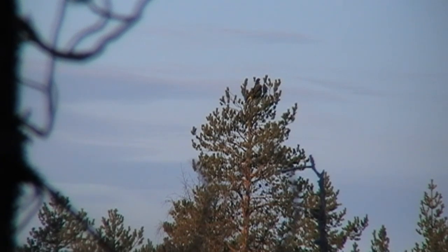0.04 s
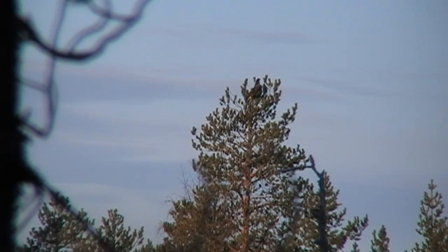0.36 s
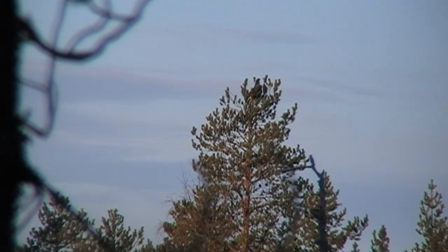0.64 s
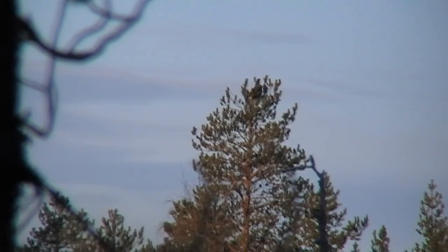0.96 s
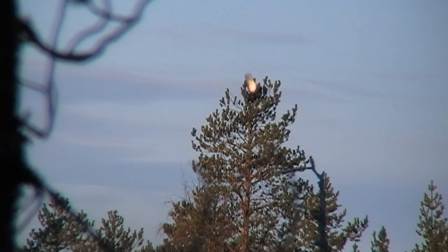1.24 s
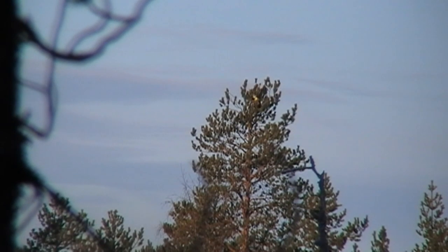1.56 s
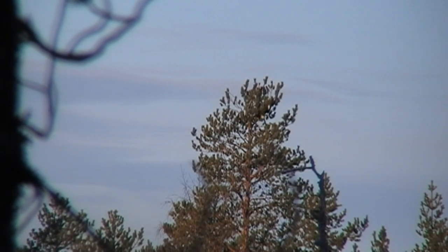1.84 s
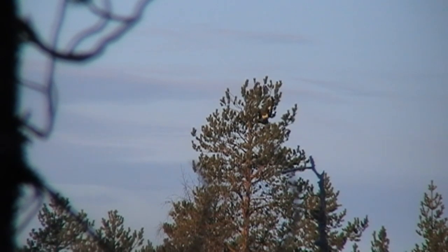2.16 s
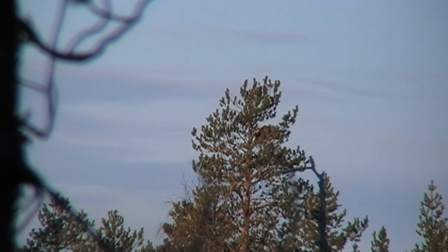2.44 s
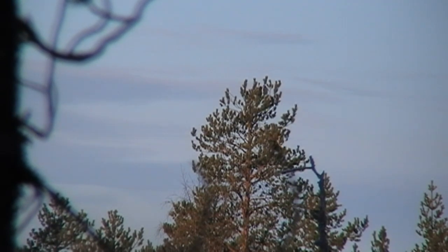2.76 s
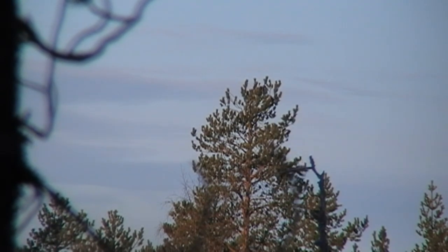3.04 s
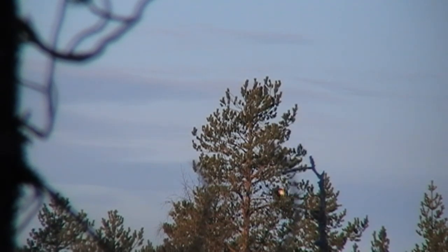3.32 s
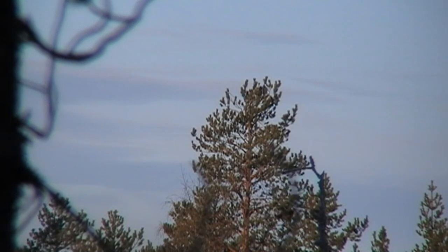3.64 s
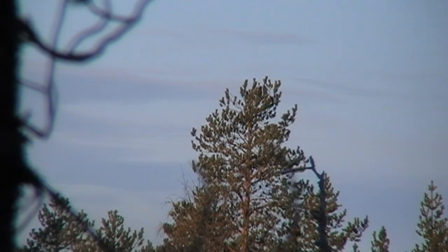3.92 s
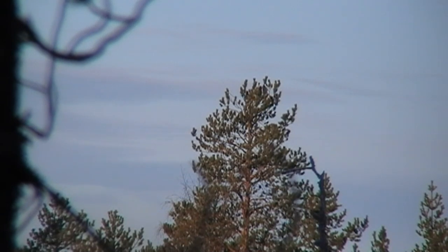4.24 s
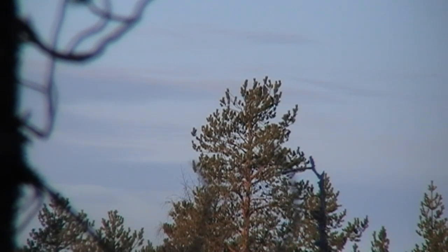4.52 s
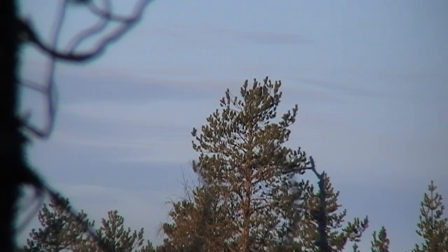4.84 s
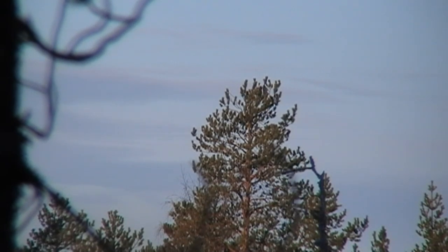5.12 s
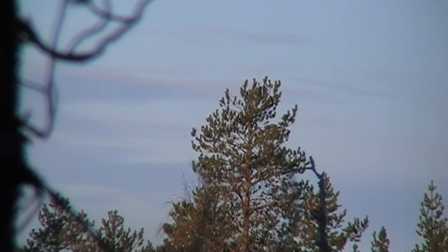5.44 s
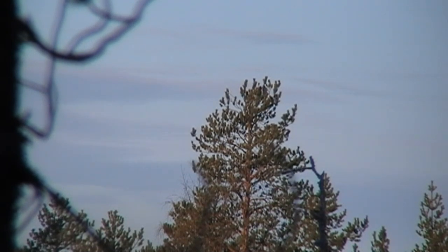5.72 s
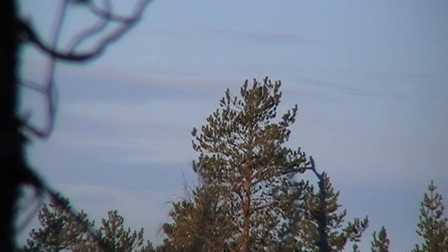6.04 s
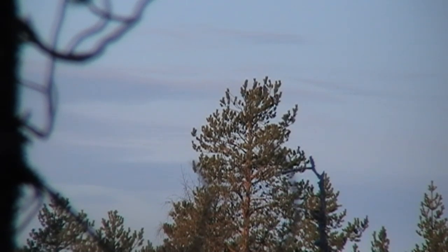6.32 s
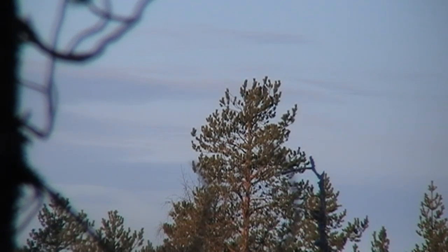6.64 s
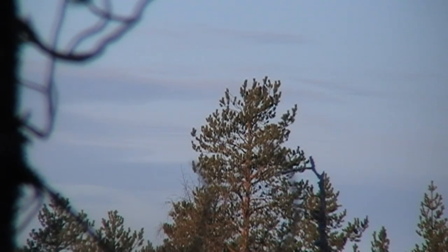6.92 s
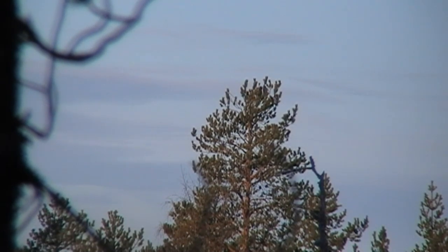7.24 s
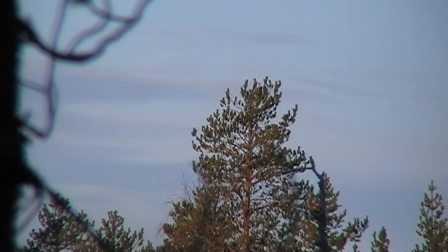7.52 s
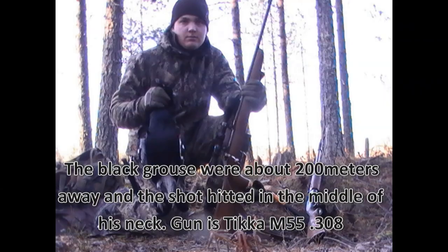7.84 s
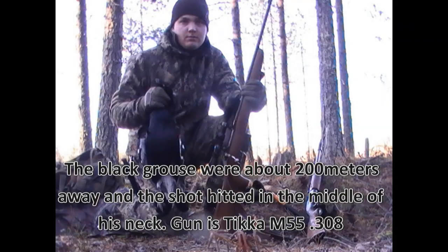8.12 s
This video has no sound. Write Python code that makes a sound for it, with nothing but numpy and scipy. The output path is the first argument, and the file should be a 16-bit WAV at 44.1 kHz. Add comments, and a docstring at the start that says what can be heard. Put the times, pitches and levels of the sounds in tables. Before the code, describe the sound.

It starts very quietly in a pine forest, with faint wind, a steady hiss and the thin whine and rustle of a camera's own motors. At about 0.9 seconds a single rifle shot goes off right beside the microphone, a sudden, very loud blast that briefly overloads it. Until about 1.5 seconds a bright crack scatters back from the trees, with a few hard snaps off individual trunks. The blast rolls on as a broad echo, swelling around 1.6 and 2.4 seconds, then fading steadily and growing duller with distance over the next several seconds. From about 3.5 seconds the small lens motor gradually comes through the dying echo, with short, faint whirs, hums and tiny ticks over the soft wind and hiss. These continue until the sound cuts off at about 7.8 seconds.

```python
"""One rifle shot in a pine forest, fired beside a camera.
At first there is only faint wind and hiss, and the whine and rustle of the camera's own motors.
About a second in, the muzzle blast hits and overloads the camera's microphones.
The bullet's bright crack then scatters back from the tree trunks, and the blast rolls on for
seconds, duller with distance. As it fades, the little motors come through again."""
import sys
import numpy as np
from scipy import signal
from scipy.fft import rfft, irfft, next_fast_len
from scipy.io import wavfile
from scipy.ndimage import uniform_filter1d, minimum_filter1d, map_coordinates

SR = 44100
rng = np.random.default_rng(int(sys.argv[2]) if len(sys.argv) > 2 else 0)


def wrap_up_sound(samples):
    """Save the sound to the file named by the first command line argument, as 16-bit audio."""
    columns = np.atleast_2d(samples).T
    # keep every value between -1 and 1, then stretch to whole-number steps
    tamed = np.clip(columns, -1, 1)
    steps = np.round(tamed * 32767).astype(np.int16)
    wavfile.write(sys.argv[1], SR, steps)


N = 364707
T = np.arange(N) / SR
SHOT_S, END_S = 0.9444, 7.772

# Tone colours of the wind and the hiss: (frequency [Hz], relative level [dB])
WIND_COLOUR = [(30, -23.5), (100, -19), (200, -5.5), (300, 3), (500, -2), (850, -3.5), (1200, -10),
               (2500, -25), (8000, -47)]
HISS_COLOUR = [(300, -11), (1200, 1), (2400, 1), (3300, -3.5), (4500, -7.5), (5800, -5.5), (8000, -11.5),
               (11000, -13.5), (15500, -23)]
# Stereo width of the background: (frequency [Hz], side compared with middle [dB])
BACKGROUND_WIDTH = [(60, 4.5), (700, 3), (1400, 5.5), (2400, 0), (4400, 5.5), (15000, -1)]
# Tone colour of the camera's faint buzz: (frequency [Hz], relative level [dB])
BUZZ_COLOUR = [(1500, -35.5), (3200, 1.5), (4100, -2.5), (5000, -11), (7500, -14.5), (14000, -45.5)]
# Runs of the lens drive: (start [s], end [s], rustle level [dB], load on the motor [0-1])
LENS_RUNS = [(0.064, 0.108, -66, .7), (.32, 0.497, -67.5, 0.76), (3.36, 3.441, -61.5, .8),
             (3.84, 3.885, -62.5, .8), (4.24, 4.383, -68, 0.77), (4.68, 4.96, -68, 0.95),
             (5.01, 5.219, -63.5, 0.6), (5.27, 5.4, -65, 1), (5.802, 5.971, -71.5, 0.52),
             (6.07, 6.28, -66.5, .85), (6.47, 6.55, -69.5, 0.38), (6.73, 6.92, -69, .45),
             (7.118, 7.283, -68.5, 0.43), (7.691, 7.78, -69, .25)]
# Short, lower hums of the lens drive: (time [s], half length [s], level [dB])
LENS_HUMS = [(0.085, 0.016, -69), (0.343, .03, -68), (0.44, 0.031, -74), (4.842, 0.023, -61),
             (6.166, .04, -74), (6.824, .025, -62.5), (7.221, 0.052, -65.5), (7.737, 0.042, -67)]
# Single steps of the lens drive: (time [s], relative peak level [dB], fade time [s])
LENS_TICKS = [(0.1037, -65, .008), (0.3556, -70, 0.0085), (0.483, -64.5, 0.022), (1.892, -48, 0.032),
              (2.415, -56, 0.03), (4.3297, -62, 0.006), (4.4434, -56.5, 0.0046), (4.5587, -58, .007),
              (4.8424, -60, 0.0053), (4.9194, -59, .007), (5.022, -58, 0.01), (5.3766, -60, .008),
              (5.878, -62, .004), (6.254, -57, 0.0092), (6.4494, -59, 0.004), (6.485, -52, 0.0055)]
# Pitches at which the camera's case rings: (frequency [Hz], width [Hz], relative level [dB])
CASE_RINGS = [(1430, 240, 4), (2920, 270, 2.5), (3264, 190, 5), (3850, 400, 0), (4770, 600, -7),
              (5700, 400, -7.5), (7400, 270, -9)]

# Tone colours of the two echoes before the air dulls them: (frequency [Hz], relative level [dB])
CRACK_ECHO_COLOUR = [(300, -73), (600, -34.5), (1000, -12), (1250, -10), (1550, -2.5), (1800, -1.5),
                     (2080, 0.5), (2450, -7.5), (3100, -8), (4200, -17), (5600, -24.5), (6500, -31.5),
                     (8200, -36), (10500, -47.5), (15000, -55.5)]
ROLL_ECHO_COLOUR = [(50, -56), (110, -52), (180, -34.5), (260, -17), (380, -7), (520, -2), (680, 0.5),
                    (880, 0.5), (1100, -7.5), (1400, -14.5), (2000, -23), (3500, -45), (8000, -93)]
# Soft ground and trunks swallow the lows of early echoes: (frequency [Hz], relative level [dB])
GROUND_COLOUR = [(60, -7), (150, -16), (280, -16), (450, -9), (650, -2), (900, 4)]
# Brightness of the scattered crack: (time [s], slope from 2 to 3.5 kHz [dB per octave])
CRACK_BRIGHTNESS = [(1.02, 5.5), (1.15, 3), (1.245, 1), (1.29, -2), (1.37, -5), (1.6, -8), (2.0, -2),
                    (2.6, -5.5)]
# Stereo width of the echoes: (frequency [Hz], side compared with middle [dB])
ECHO_WIDTH = [(60, 1.5), (150, -7), (350, -17), (700, -18), (1300, -10), (2300, -17), (3200, -4.5),
              (4400, 3.5), (8000, 2), (15000, -5.5)]
# Which way the echoes lean: (frequency [Hz], left minus right [dB])
ECHO_BALANCE = [(200, 0.5), (600, -1), (900, 0), (1300, 1.5), (2400, 2), (4400, 2), (9000, -1)]
# Hillsides and thick trees swell the echoes, clearings thin them:
# (time [s], half length [s], change in the crack [dB], change in the roll [dB])
LANDSCAPE = [(1.072, 0.026, -3.5, -4), (1.21, 0.085, 0.5, 1.3), (1.284, 0.021, 3, 0),
             (1.385, 0.034, -1, -3), (1.619, 0.066, .6, 5.5), (2.021, .09, -0.4, -2),
             (2.358, 0.16, 1.55, 2), (5.55, 0.17, -1.5, -0.7), (6.75, 0.71, 2, 3)]
# Single hard echoes from trunks along the bullet's path: (time [s], peak level [dB], pitch [Hz])
TRUNK_ECHOES = [(1.0003, -8.5, 2240), (1.006, -7.5, 870), (1.029, -17, 2030), (1.1221, -7.5, 2160),
                (1.2689, -8.5, 2000), (1.2768, -14, 2050), (1.2893, -5.5, 1850), (1.2913, -6.5, 2040),
                (1.3421, -1, 1980)]

# Tone colours of the blast and its boom off the ground: (frequency [Hz], relative level [dB])
MUZZLE_COLOUR = [(30, -28), (100, -23), (200, -17.5), (330, -10.5), (470, -8), (780, -1.5), (1200, -11),
                 (1950, 2.5), (2450, -8.5), (3100, -7), (4200, -13), (6400, -19.5), (10000, -32),
                 (15500, -45.5)]
GROUND_BOOM_COLOUR = [(30, -9), (70, -5.5), (150, -1), (300, 6.5), (450, 3.5), (700, -17.5), (1500, -61.5)]
# Stereo width of the blast: (frequency [Hz], side compared with middle [dB])
MUZZLE_WIDTH = [(60, -2.5), (200, -1), (700, -2), (2000, -7.5), (4400, 1), (12000, 2.5)]


def amp(db):
    """Turn decibels into a number to multiply by."""
    return 10 ** (np.asarray(db) / 20)


def along(points, hz):
    """Read a (frequency, value) table at hz, with frequencies spaced by octaves."""
    frequencies, values = np.transpose(points)
    return np.interp(np.log(hz + 1), np.log(frequencies + 1), values)


def noise():
    """Two unrelated white noises."""
    return rng.standard_normal((2, N))


def wobble(rate):
    """A smooth curve through `rate` random points a second."""
    return map_coordinates(rng.standard_normal(int(N * rate / SR) + 4), [T * rate])


def filtered(x, response):
    """Make each frequency of x louder or softer by response(hz)."""
    size = next_fast_len(N + SR // 2)
    return irfft(rfft(x, size) * response(np.fft.rfftfreq(size, 1 / SR)), size)[..., :N]


def coloured(pair, colour, width):
    """Turn two unrelated signals into left and right, with a tone colour and a stereo width."""
    mid, side = filtered(pair, lambda hz: amp([along(colour, hz), along(colour, hz) + along(width, hz)]))
    return np.array([mid + side, mid - side]) / np.std(mid)


def fuzzy_tone(pitch_hz, width_hz):
    """A narrow band of noise around a wavering pitch, at an average (rms) level of 1."""
    phase = 2 * np.pi * np.cumsum(pitch_hz + 30 * wobble(30)) / SR
    a, b = filtered(noise(), lambda hz: 1 / (1 + (hz / width_hz) ** 4))
    tone = a * np.cos(phase) + b * np.sin(phase)
    return tone / np.sqrt(np.mean(tone ** 2) + 1e-20)


def envelope(start_s, attack_s, hold_s, fall_db_per_s):
    """Rises to 1, holds until hold_s after the start, then dies away."""
    age = T - start_s
    return np.clip(age / attack_s, 0, 1) * amp(-fall_db_per_s * np.maximum(age - hold_s, 0))


def swell(time_s, half_s):
    """A bell-shaped rise and fall around a moment."""
    return np.exp(-((T - time_s) / half_s) ** 2 / 2)


def running(start_s, end_s, ramp_s):
    """0 at rest, sliding towards 1 while the lens drive runs."""
    return np.clip(.5 + np.minimum(T - start_s, end_s - T) / ramp_s, 0, 1)


def wind_and_hiss(wind_db=-72, hiss_db=-72):
    """Faint wind in the pines over a steady hiss."""
    wind = amp(wind_db + .9 * wobble(4.2)) * coloured(noise(), WIND_COLOUR, BACKGROUND_WIDTH)
    return wind + amp(hiss_db) * coloured(noise(), HISS_COLOUR, BACKGROUND_WIDTH)


def motor(whine_db=-65.5, whine_hz=1954, sag_db=6.5, sag_hz=150, buzz_db=-78, ticks_per_s=50):
    """A whine that sags under load, short lower hums, and a faint camera buzz of 50 ticks a second."""
    load = sum(share * running(start, end, ramp_s=.09) for start, end, _, share in LENS_RUNS)
    load = np.clip(load, 0, 1)
    whine_level = amp(whine_db - sag_db * load + wobble(9))
    whine = whine_level * fuzzy_tone(whine_hz - sag_hz * load, width_hz=165)
    since_tick = T % (1 / ticks_per_s)
    ticks = noise() * np.exp(-since_tick / .005)
    buzz = amp(buzz_db) * coloured(ticks, BUZZ_COLOUR, BACKGROUND_WIDTH)
    hum_level = sum(amp(db) * swell(time, half) for time, half, db in LENS_HUMS)
    return whine + hum_level * fuzzy_tone(pitch_hz=1440, width_hz=48) + buzz


def camera_case(hz, soft_hz=8500):
    """How much of each frequency the case passes: it rings at a few pitches and softens the top."""
    rings = sum((-1) ** k * amp(db) * 1j * hz * width / (pitch ** 2 - hz ** 2 + 1j * hz * width)
                for k, (pitch, width, db) in enumerate(CASE_RINGS))
    return rings / (1 + (hz / soft_hz) ** 6)


def lens_drive(idle_db=-77, tick_gain_db=-.5, width=.7):
    """The lens drive rustles and ticks, heard through the ringing case."""
    runs = sum(amp(db) * running(start, end, ramp_s=.032) for start, end, db, _ in LENS_RUNS)
    level = np.maximum(amp(idle_db), runs * amp(1.5 * wobble(33)))
    for time, peak_db, fade_s in LENS_TICKS:
        level += amp(tick_gain_db + peak_db) * (T > time) * np.exp(-np.abs(T - time) / fade_s)
    grains = noise() * amp(3 * wobble(250))
    mid, side = filtered(level * grains, camera_case) / np.std(filtered(grains, camera_case))
    return np.array([mid + width * side, mid - width * side])


def scatter(colour, spread_db, air_loss, air_power, ground_s, sparkle):
    """Countless echoes of uneven size; later ones have crossed more air and lost more treble."""
    echoes = coloured(noise() * amp(spread_db * wobble(500)), colour, ECHO_WIDTH)
    hz, times, spectrum = signal.stft(echoes, SR, nperseg=1024)
    hz, age = hz[:, None], np.maximum(times - SHOT_S, 0)
    khz = hz / 1000
    slope = sparkle * np.interp(times, *np.transpose(CRACK_BRIGHTNESS))
    bright_db = slope * np.log2(np.clip(khz, 2, 3.5) / 2)
    air_db = air_loss * khz ** air_power * age
    ground_db = along(GROUND_COLOUR, hz) * np.exp(-(age / ground_s) ** 2)
    gain = amp(bright_db - air_db + ground_db)
    # change only the tone colour and keep the overall level steady
    power = np.mean(np.abs(spectrum.mean(axis=0)) ** 2, axis=1, keepdims=True)
    gain /= np.sqrt(np.sum(power * gain ** 2, axis=0) / power.sum())
    lean_db = along(ECHO_BALANCE, hz)
    pan = amp([lean_db / 2, -lean_db / 2])
    return signal.istft(spectrum * gain * pan, SR, nperseg=1024)[1][:, :N]


def rolling_echo(level_db=-28.5, attack_s=.052, hold_s=1.578, loss_db_per_doubling=15.5):
    """The blast holds as it crosses the nearest hills, then drops each time its path doubles."""
    age = T - SHOT_S
    doublings = np.log2(np.maximum(age / hold_s, 1))
    level = np.clip(age / attack_s, 0, 1) * amp(level_db - loss_db_per_doubling * doublings)
    swell_db = sum(db * swell(time, half) for time, half, _, db in LANDSCAPE)
    echoes = scatter(ROLL_ECHO_COLOUR, spread_db=.5, air_loss=2, air_power=1.5, ground_s=1.7, sparkle=0)
    return level * amp(swell_db) * echoes


def scattered_crack(near_db=-18.5, far_db=-44, delay_s=.025, attack_s=.052, hold_s=.54):
    """The bullet's crack comes back from near trees, over a fainter, slower tail from far ones."""
    near = amp(near_db) * envelope(SHOT_S + delay_s, attack_s, hold_s, fall_db_per_s=15)
    far = amp(far_db) * envelope(SHOT_S + delay_s, attack_s, hold_s, fall_db_per_s=5)
    swell_db = sum(db * swell(time, half) for time, half, db, _ in LANDSCAPE)
    echoes = scatter(CRACK_ECHO_COLOUR, spread_db=1, air_loss=3.5, air_power=1.214,
                     ground_s=.52, sparkle=1)
    return np.hypot(near, far) * amp(swell_db) * echoes


def trunk_echoes(rise_s=.00065):
    """A single trunk throws the crack back whole: a snap just a few waves long."""
    out = np.zeros(N)
    t = np.arange(SR // 50) / SR
    for time, peak_db, hz in TRUNK_ECHOES:
        snap = t / rise_s * np.exp(1 - t / rise_s) * np.sin(2 * np.pi * hz * t)
        out[round(time * SR):][:len(t)] += amp(peak_db) * snap
    return out


def muzzle_blast(front_s=.00012, snap_s=.002, boom_fall_db_per_s=30):
    """A sudden jump in air pressure with a bright snap, a low boom and a burst of close echoes."""
    age = np.maximum(T - SHOT_S, 0)
    front = amp(2) * (1 - age / front_s) * np.exp(-age / front_s)
    snap = amp(-9) * np.exp(-age / snap_s) * noise()
    boom = amp(-42 - boom_fall_db_per_s * age) * coloured(noise(), GROUND_BOOM_COLOUR, ECHO_WIDTH)
    direct = amp(-5) * envelope(SHOT_S, attack_s=.0003, hold_s=.001, fall_db_per_s=1200.5)
    trunks = amp(-7) * envelope(SHOT_S + .0048, attack_s=.007, hold_s=.023, fall_db_per_s=518.5)
    bushes = amp(-31) * envelope(SHOT_S, attack_s=.03, hold_s=.05, fall_db_per_s=140)
    burst_level = np.sqrt(direct ** 2 + trunks ** 2 + bushes ** 2)
    burst = burst_level * coloured(noise(), MUZZLE_COLOUR, MUZZLE_WIDTH)
    return (T > SHOT_S) * (front + snap + boom) + burst


def scene():
    """The shot, its echoes and the quiet background."""
    shot = muzzle_blast() + scattered_crack() + rolling_echo() + trunk_echoes()
    return shot + motor() + lens_drive() + wind_and_hiss()


def limiter(x, ceiling=1.35, window=66):
    """Turns loud peaks down fast; it lags a little, so the first jump gets through."""
    needed = ceiling / np.maximum(np.abs(x).max(axis=0), ceiling)
    held = minimum_filter1d(needed, window, origin=window // 3)
    return x * uniform_filter1d(held, window, origin=window // 3)


def cut_lows(x, hz):
    """Take away the rumble below hz."""
    return signal.sosfilt(signal.butter(2, hz, "high", fs=SR, output="sos"), x)


def record(dry, bend=.041, max_level=1.4, top_hz=15800):
    """The microphones bend loud peaks unevenly; the camera limits and flattens them, then stops."""
    bent = dry + bend * cut_lows(np.abs(dry) ** 3, hz=50)
    limited = limiter(cut_lows(bent, hz=20))
    flattened = limited / (1 + np.abs(limited / max_level) ** 8) ** (1 / 8)
    sudden_stop = np.clip((END_S - T) / .0081, 0, 1)
    treble_cut = signal.ellip(10, .1, 80, top_hz, fs=SR, output="sos")
    return signal.sosfilt(treble_cut, flattened * sudden_stop)


dry = scene()
out = record(dry)
wrap_up_sound(out)
```